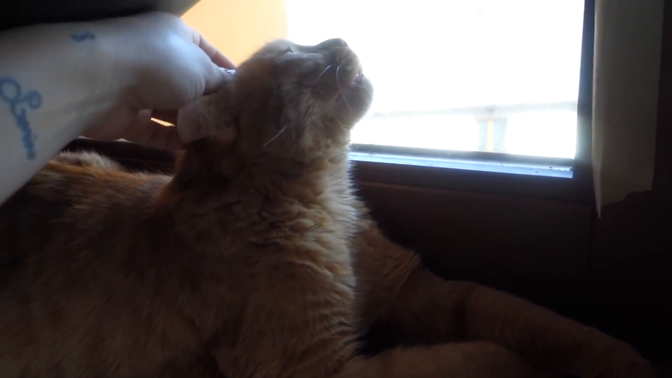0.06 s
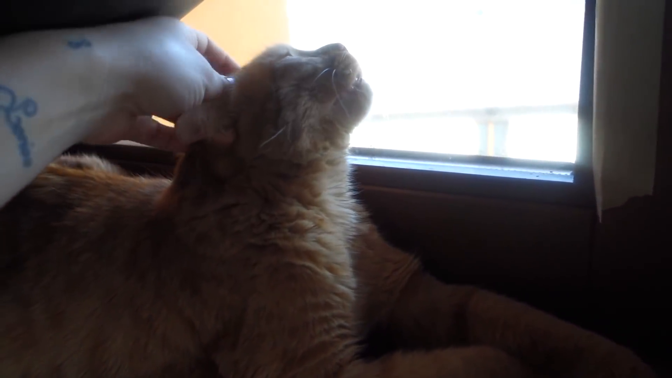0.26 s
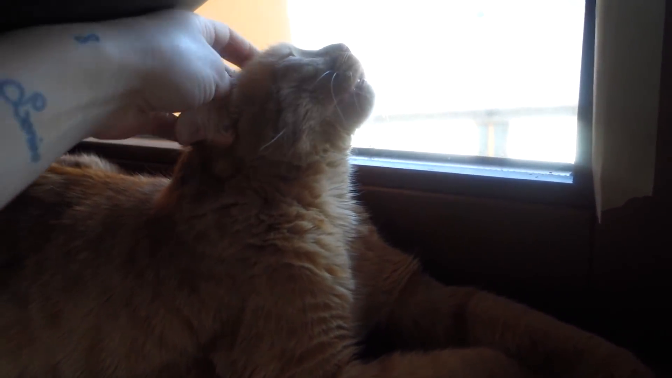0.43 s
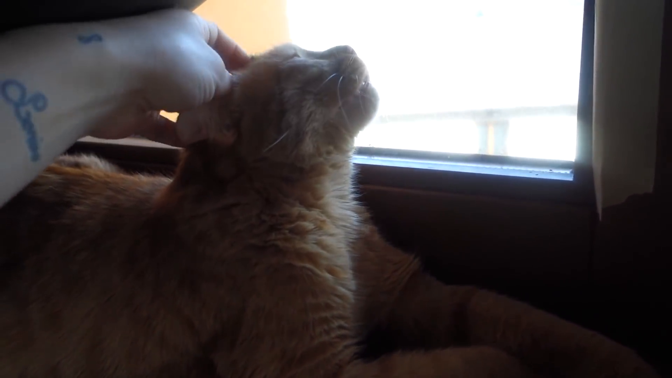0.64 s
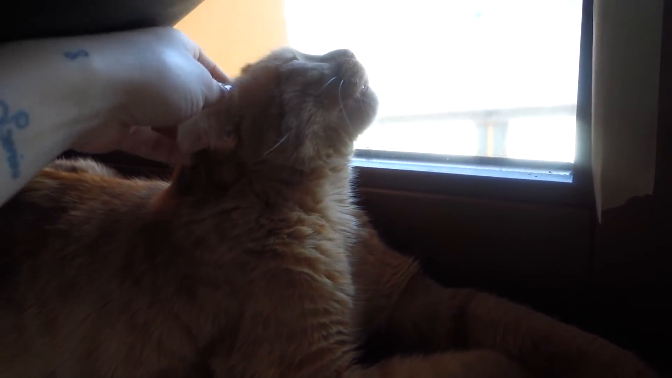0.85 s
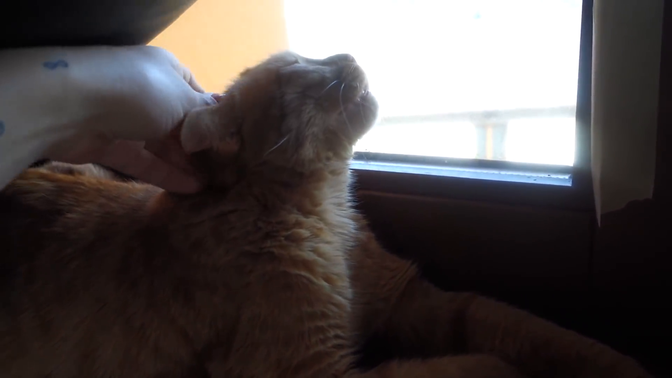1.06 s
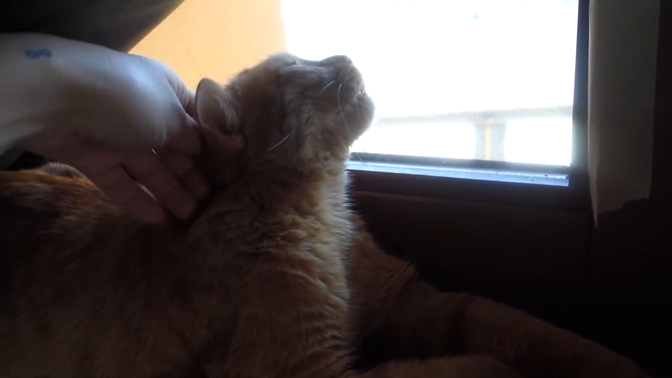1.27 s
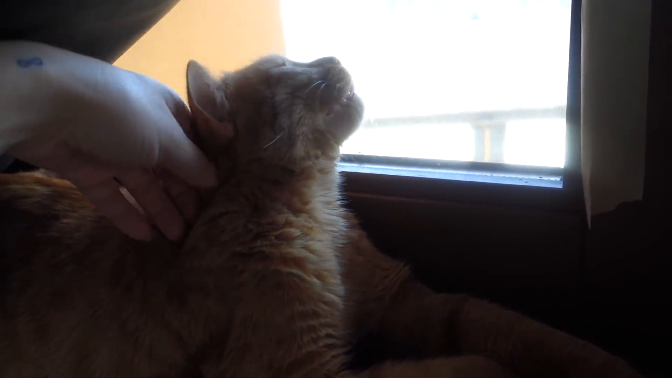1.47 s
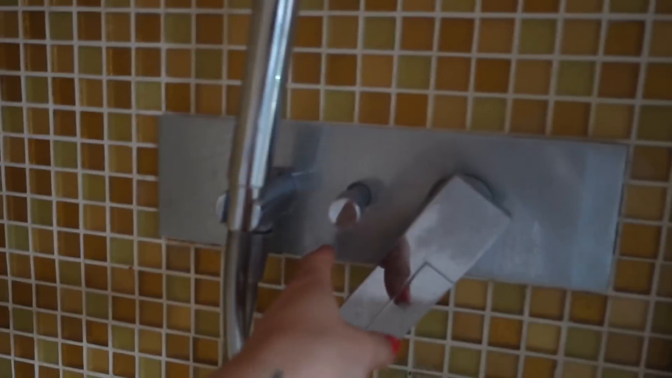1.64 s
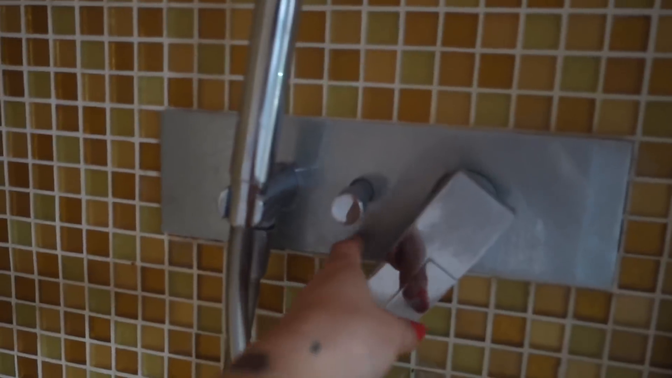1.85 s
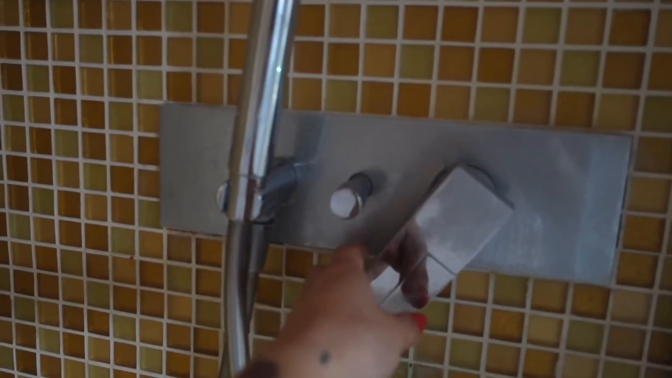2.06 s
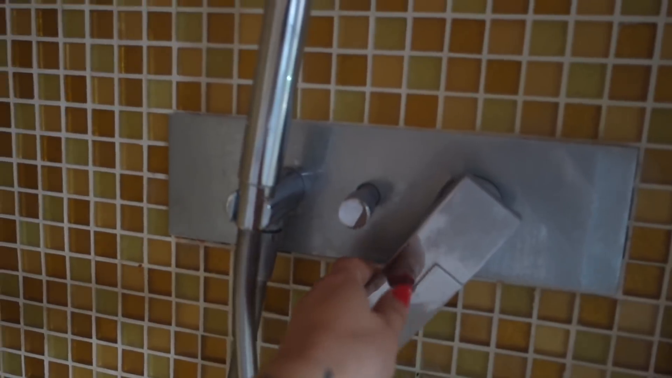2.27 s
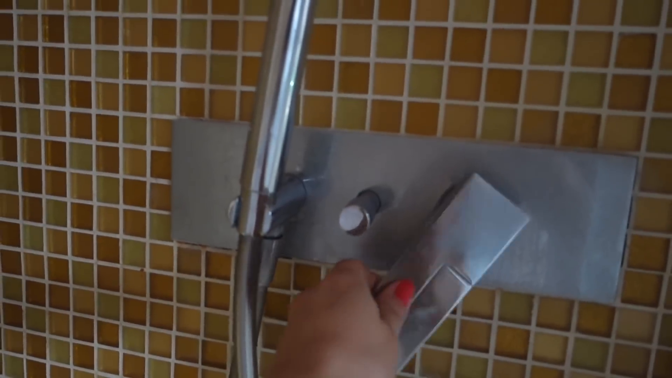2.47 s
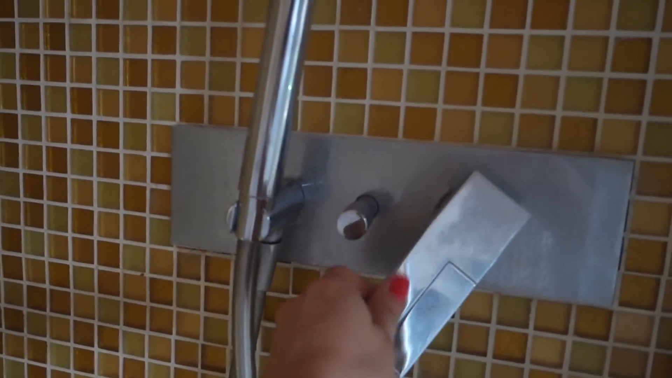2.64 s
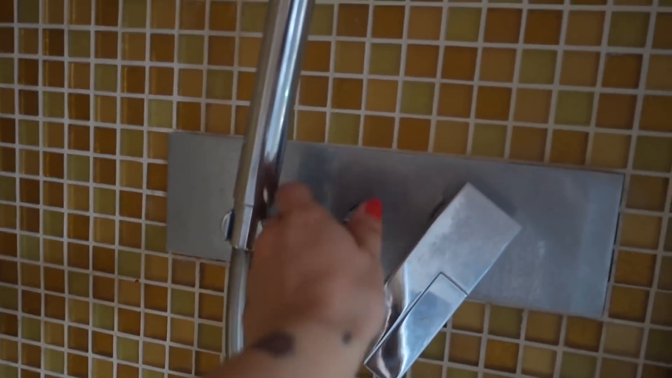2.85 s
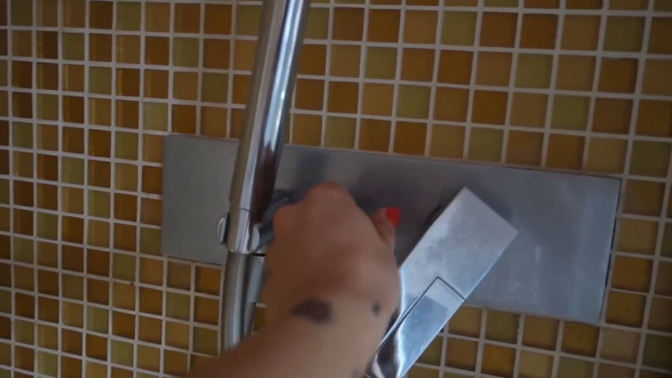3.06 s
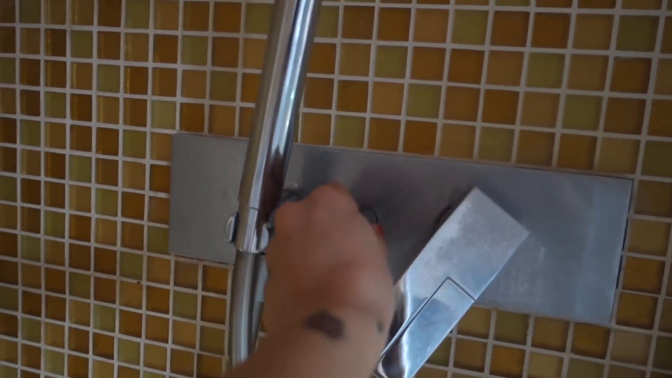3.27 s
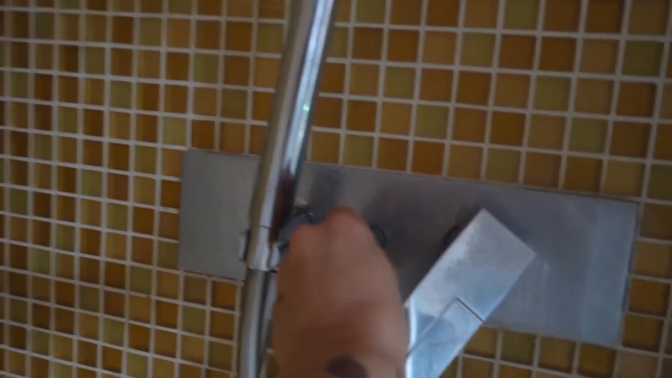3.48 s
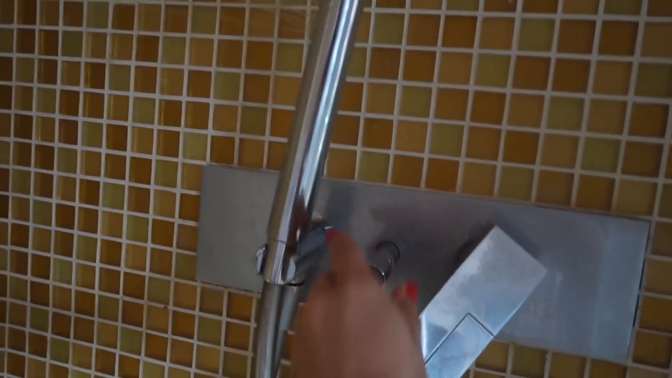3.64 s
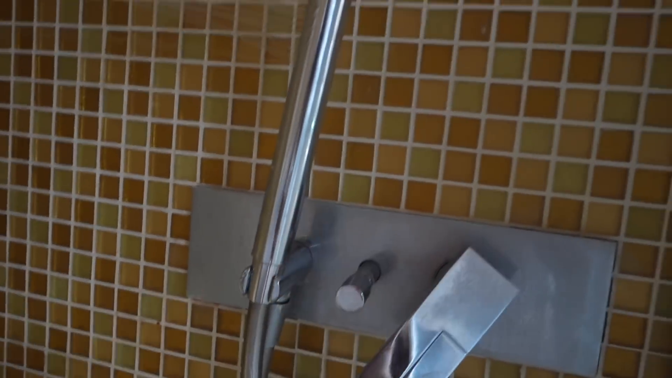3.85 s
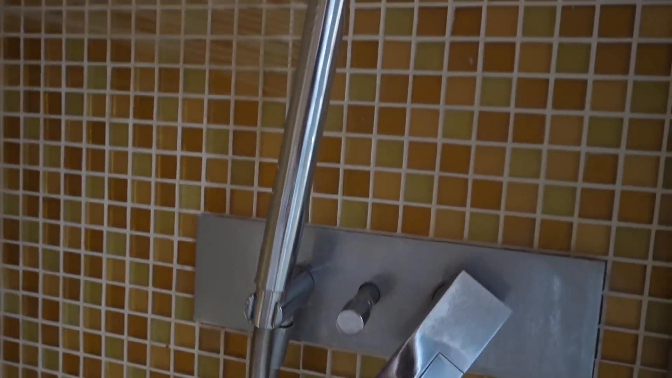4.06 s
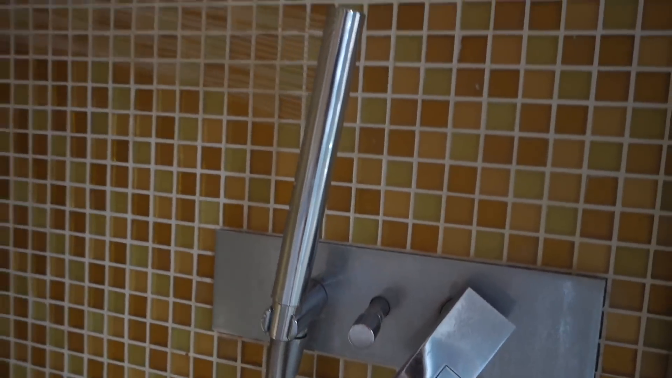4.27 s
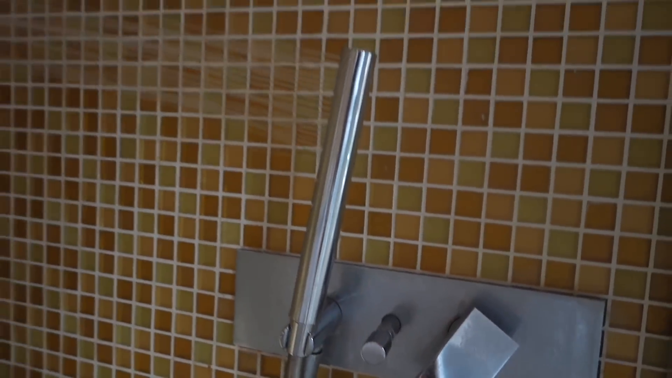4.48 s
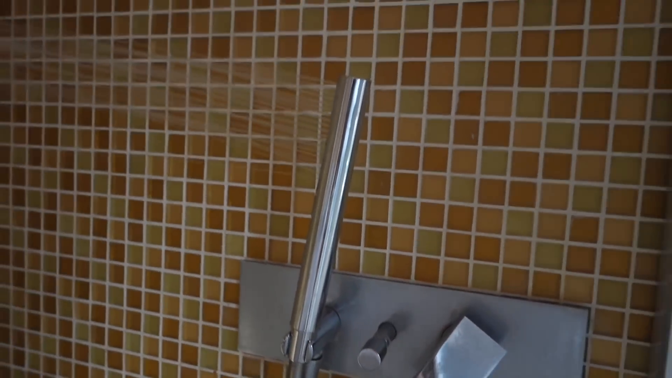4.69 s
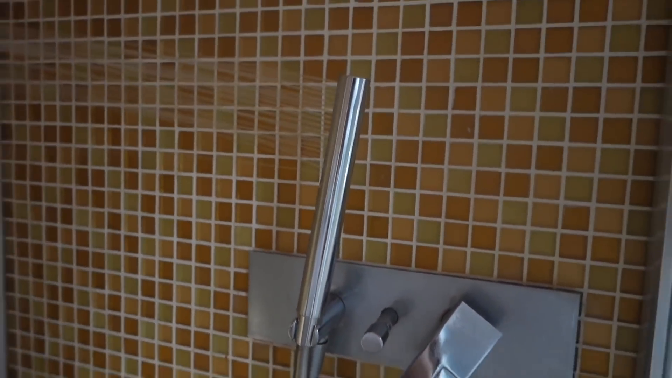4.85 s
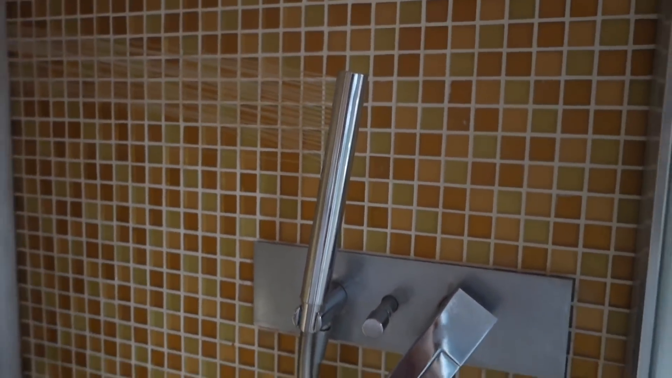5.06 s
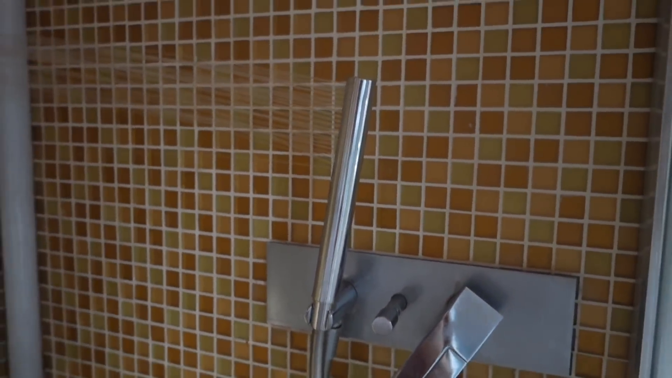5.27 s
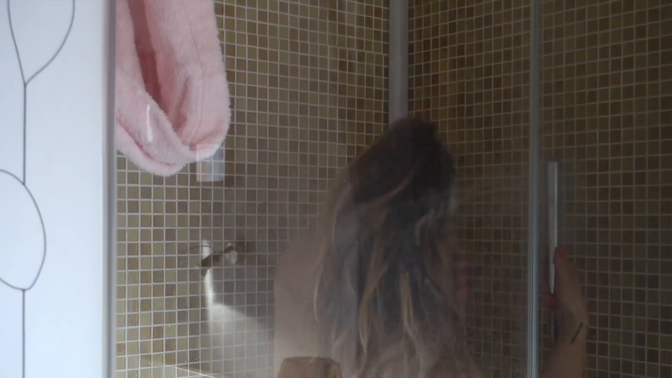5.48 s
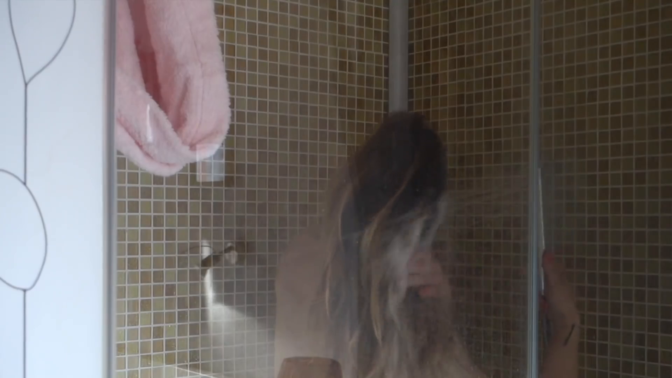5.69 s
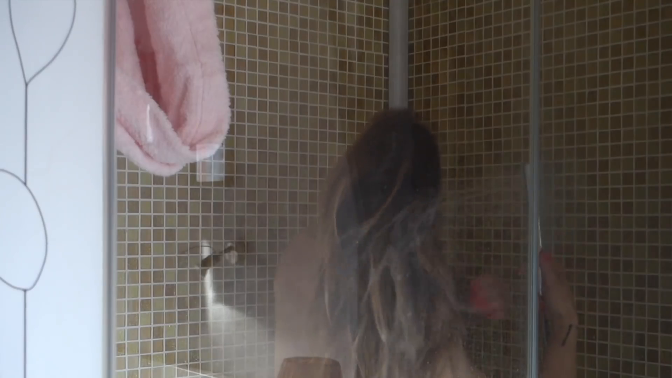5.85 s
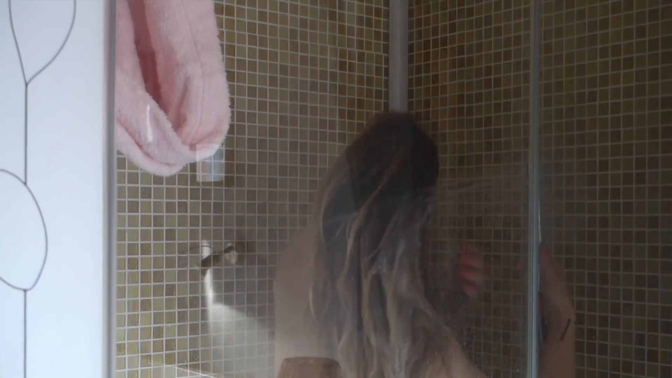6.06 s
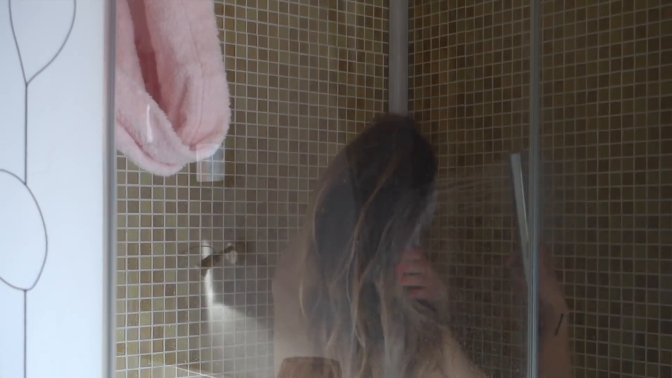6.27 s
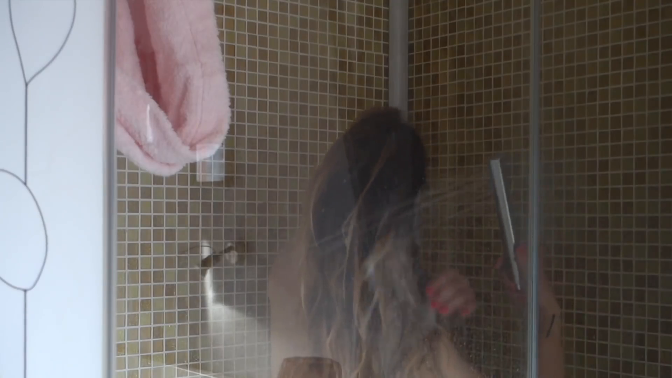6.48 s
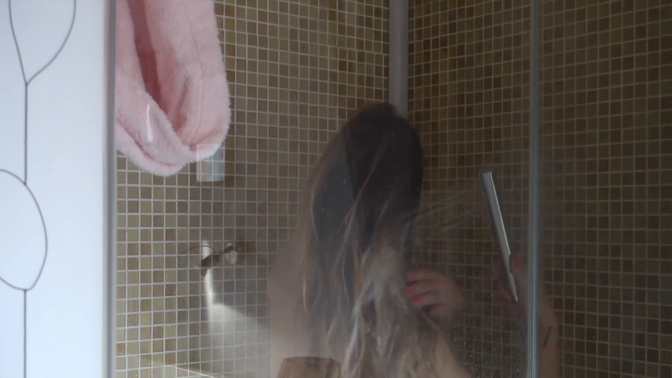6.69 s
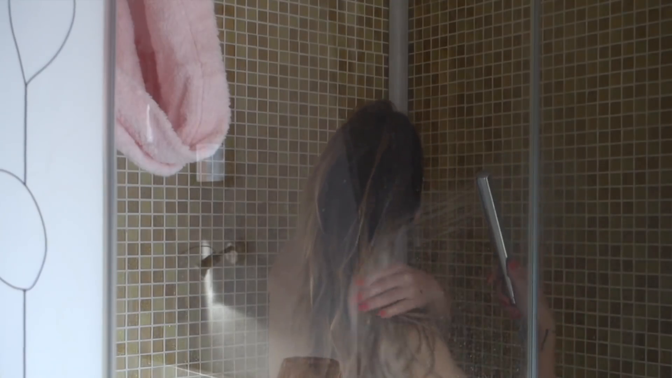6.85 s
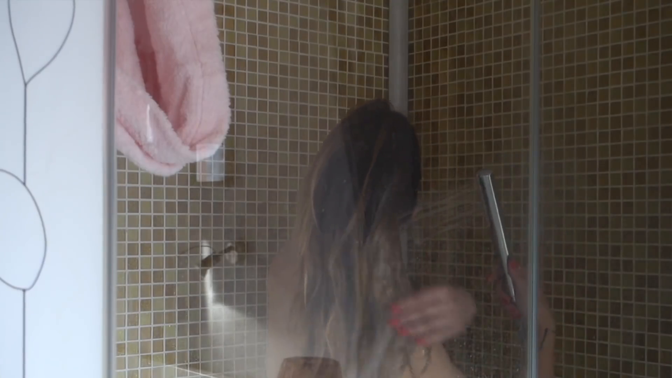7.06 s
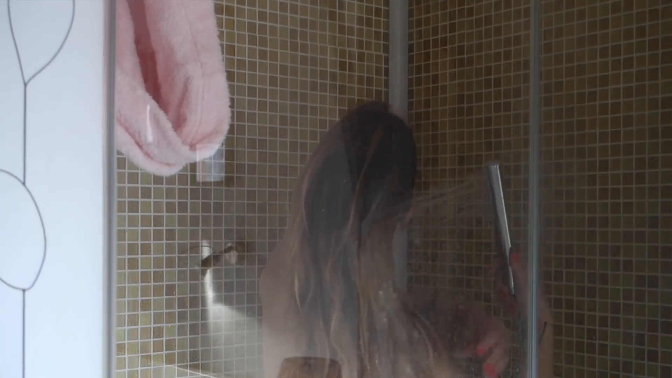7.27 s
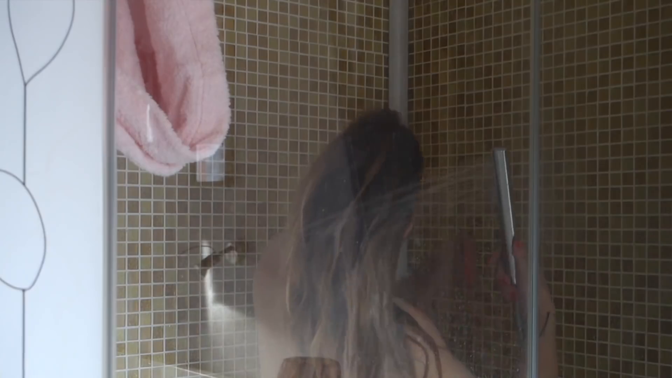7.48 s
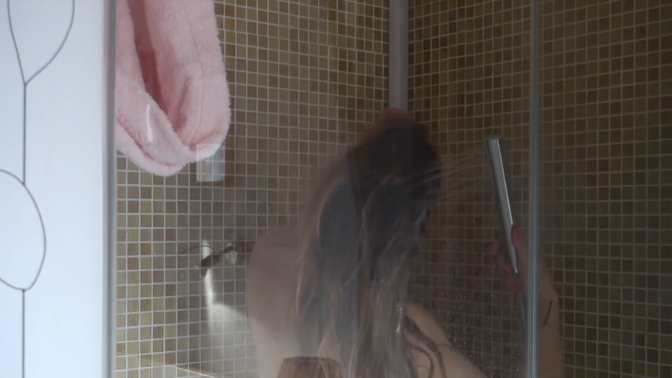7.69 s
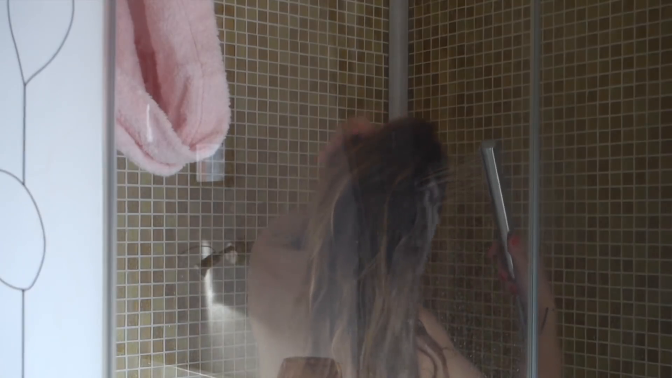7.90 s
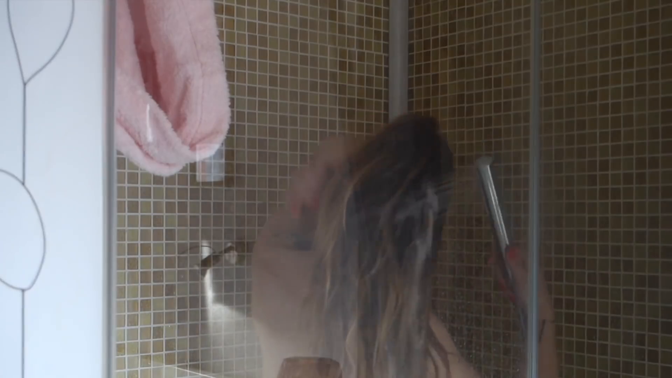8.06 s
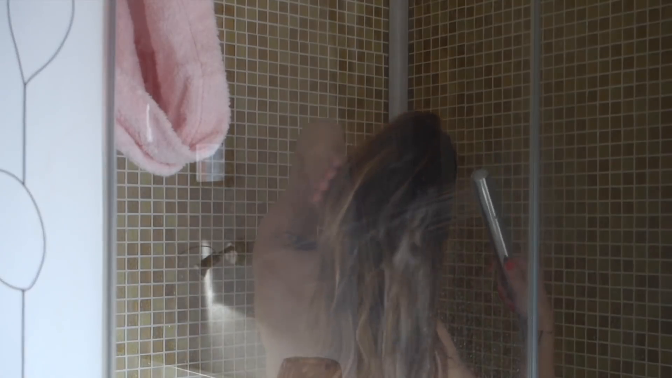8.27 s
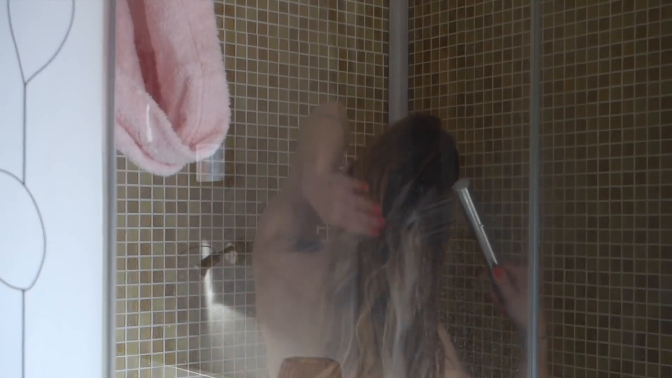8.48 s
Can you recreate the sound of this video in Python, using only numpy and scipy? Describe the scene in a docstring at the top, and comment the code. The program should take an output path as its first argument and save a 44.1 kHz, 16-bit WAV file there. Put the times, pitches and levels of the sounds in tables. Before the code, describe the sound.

Quiet room air, then a shower lever creaks, water gurgles and spits, a knock, and bright spray hisses on tiles before splattering through wet hair.

```python
"""A quiet room by a window is heard first, then the hollow air of a tiled shower cubicle: shaped noise.
The mixer lever is lifted, water gurgles through the tap as impacts on pipe resonances, and air spits out
as short noise bursts; the diverter shuts with a knock of decaying partials and a thud. The hand shower, dense
random impacts, hisses on the tiles, then plays on long hair, from which clumps slap the wet floor as bursts."""
import sys
import numpy as np
from scipy import signal
from scipy.fft import rfft, irfft, next_fast_len
from scipy.io import wavfile
from scipy.ndimage import uniform_filter1d

SR = 44100
rng = np.random.default_rng(int(sys.argv[2]) if len(sys.argv) > 2 else 0)


def unload_audio(sound):
    """Save the sound as a 16-bit wav file, at the path given as the first command line argument."""
    columns = np.transpose(np.atleast_2d(sound))
    # keep every value between -1 and 1, then stretch to whole-number steps
    steps = np.round(np.clip(columns, -1, 1) * 32767)
    wavfile.write(sys.argv[1], SR, steps.astype(np.int16))


N = 376173
TIME = np.arange(N) / SR

# Spectra, relative spectral density [f/Hz, level/dB]
# still air at the window and in the cubicle, and a steady hiss over both
WINDOW_SPECTRUM = [(47, -64), (80, -32), (195, -26), (329, -21.5), (369, -22.5), (459, -20.5), (487, -22),
                   (615, -4), (835, -7.5), (911, -4.5), (1150, -9), (1260, -3), (1490, -19), (1630, -10),
                   (2600, -27), (3380, -43), (5720, -120)]
CUBICLE_SPECTRUM = [(88, -58), (150, -26), (167, -14.5), (200, -25), (326, -9), (525, -16), (551, -15),
                    (636, -4.5), (779, -11.5), (1020, -5), (1140, 3.5), (1270, -6), (1590, -0.5),
                    (1860, -8), (2600, -25), (3380, -47), (5720, -120)]
HISS_SPECTRUM = [(1410, -23), (2400, 0), (3440, -4), (3910, -2.5), (5010, -5), (13000, -6)]
# water gushing from the spout, its fizz, and the rumble of the fitting [f/Hz, level/dB]
GUSH_SPECTRUM = [(70, -43), (140, -23), (170, -6.5), (200, -12), (500, 1.5), (900, -1), (1300, -2),
                 (1900, 2), (2600, -7), (3600, -26), (6000, -48)]
SPOUT_SPECTRUM = [(1800, -26), (2900, 6.5), (4300, -0.5), (5500, 3.5), (7000, -5), (10000, -5),
                  (13000, -8.5)]
RUMBLE_SPECTRUM = [(20, -18), (40, 7), (75, 11), (105, 7), (150, -25), (300, -40)]
# thud of the tiled wall and air spitting from the nozzles [f/Hz, level/dB]
THUD_SPECTRUM = [(24, -65), (40, -37), (234, -14.5), (371, 3), (647, -3), (712, 2), (886, -2.5),
                 (1020, -9.5), (1580, -2), (3190, -18), (4380, -14), (5570, -21), (7100, -39), (13000, -32)]
SPIT_SPECTRUM = [(1180, -11), (2000, -13), (2670, -13), (3980, -13), (7060, -5.5), (7630, -4), (8000, -6.5),
                 (11300, -0.5), (13000, -3.5)]
# spray on the tiles: patter on the wall and hiss of the jets [f/Hz, level/dB]
WALL_PATTER_SPECTRUM = [(35, -64), (60, -34), (135, -38.5), (179, -25.5), (259, -23.5), (335, -15),
                        (411, -10.5), (504, -11.5), (618, -7), (716, -8.5), (928, -8), (1420, -0.5),
                        (2770, -6), (5000, -7.5), (6500, -17.5), (11000, -120)]
WALL_JET_SPECTRUM = [(2650, -24), (4500, -10), (6480, -6), (12500, 0.5), (13000, -1.5)]
# spray on hair and back: drumming, streaming water, splatter, jets and one flare [f/Hz, level/dB]
DRUM_SPECTRUM = [(30, -32), (70, -26), (120, -14.5), (190, 3), (270, 0), (380, 1.5), (520, 2.5), (800, 2),
                 (1600, -40)]
WASH_SPECTRUM = [(70, -39), (250, -26), (480, -12), (640, -9.5), (880, -3), (1250, 0.5), (1700, 2),
                 (3000, -7.5), (6000, -42)]
SPLATTER_SPECTRUM = [(700, -76), (1300, -10), (2100, 4), (3200, 4), (4300, -3), (5600, -11), (7500, -13),
                     (13000, -11.5)]
HAIR_JET_SPECTRUM = [(100, -62), (2500, -8), (4500, 0.5), (7000, -6.5), (8800, -2.5), (10500, 5.5),
                     (12000, 6.5), (13200, 1)]
FLARE_SPECTRUM = [(500, -50), (4000, -5), (7000, -12), (9800, 1), (13000, -10)]
# a slap whose pitch is SLAP_HZ; other pitches scale the frequencies [f/Hz, level/dB]
SLAP_SPECTRUM = [(40, -62), (100, -38), (200, -29.5), (700, -24.5), (1400, -18), (2300, -1.5), (3000, 5),
                 (3800, 2.5), (5200, -8), (7500, -16), (13000, -24)]
# stereo image of each place [f/Hz, left-right likeness, L-R level/dB]
AIR_IMAGE = [(200, 0.43, 3), (700, .62, -5), (1150, 0, 3), (1600, 0.003, -8.5), (2670, 0, -0.5),
             (5000, 0, -5), (13000, 0.048, -6)]
WALL_IMAGE = [(300, 0.99, 0), (905, 0.69, -0.5), (1400, 0.86, -1), (2300, 0.47, -2), (3300, 0.34, -6),
              (5500, 0.036, -7.5), (8050, 0.018, -8), (11800, 0, -11.5)]
HAIR_IMAGE = [(306, 1, 0), (1100, 0.87, -.5), (2570, 1, 0), (3750, 0.72, -4), (4320, 0.2, -7),
              (6400, 0.073, -8.5), (7900, 0.32, -2.5), (12300, 0.19, -7)]
# pipe resonances [f/Hz, width/Hz, relative level/dB]
PIPE_MODES = [(265, 30, -13), (328, 20, -2.5), (362, 28, -5), (423, 19, 1.5), (473, 6.1, 3.5),
              (546, 23, -30), (616, 9.3, 1)]
# partials of the struck plumbing [f/Hz, relative level/dB, 60 dB decay time/s]
VALVE_MODES = [(179, -20.5, 0.48), (284.5, -5.5, 0.28), (366.6, 1.5, 0.25), (493, 0.5, 0.26),
               (592, -13, 0.1), (637, 3, 0.22), (720, -17, 0.075), (890, -8, 0.28), (1260, -4, 0.12),
               (1325, -8, 0.24), (1810, -16, 0.079), (2127, -5, 0.27)]
# standing waves between the tiled walls [f/Hz, boost/dB before STANDING_LOSS_DB]
STANDING_MODES = [(212, 8.5), (290, 8), (372, 4), (413, 6), (634, 7), (831, 10), (900, 7.5), (1080, 8.5),
                  (1316, 7.5)]
# knocks of lever and diverter [t/s, peak level/dB, contact cut-off f/Hz]
KNOCKS = [(2.384, -38, 1200), (2.398, -33, 600), (2.497, -30, 2430), (2.528, -29, 600),
          (3.395, -16.5, 1510), (3.406, -13.5, 5950), (3.418, -19, 1180), (3.431, -20.5, 1490),
          (3.47, -32, 800)]
# gritty ticks of the lever and the diverter knob [t/s, peak level/dB, pitch f/Hz]
TICKS = [(2.497, -42, 1850), (2.525, -40, 1710), (2.634, -40, 2300), (2.644, -25.5, 1680),
         (2.684, -37, 3460), (2.741, -44, 2590), (2.82, -27, 2700), (3.109, -32, 2010)]
# air spitting from the nozzles [t/s, peak level/dB, time scale of the burst/s]
SPITS = [(2.72, -30, 0.0017), (2.74, -26.5, 0.0029), (2.82, -24, 0.011), (2.847, -19.5, 0.0075),
         (2.908, -28, 0.0059), (3.184, -30.5, 0.0022), (3.27, -29, .007), (3.321, -20.5, 0.001),
         (3.397, -19.5, 0.00095), (3.402, -20.5, 0.003), (3.466, -28, 0.0046), (3.51, -22, 0.006)]
# groans of the pipe, one resonance each [t/s, length/s, mean f/Hz, level/dB]
GROANS = [(2.373, .11, 275.7, -37.5), (2.585, 0.068, 376, -30.5), (2.592, 0.14, 477, -27),
          (2.638, 0.075, 321, -32), (2.746, 0.055, 479, -26), (2.747, 0.076, 254, -37),
          (2.929, 0.097, 369, -34.5), (3.205, 0.13, 630, -39), (3.4, 0.083, 363, -23.5)]
# slugs of water surging from the spout [t/s, rise above the even flow/dB]
SURGES = [(2.6, 8.5), (2.645, 4), (2.82, 8), (3.12, 6.5)]
# soft bumps in the fitting, from the hand on the lever and from the knocks [t/s, level/dB]
BUMPS = [(1.925, -76), (2.3, -59), (2.405, -47), (2.575, -43), (3.41, -59), (3.475, -50)]
# how hard the jets strike hair and back, judged against STRIKE_USUAL_DB [t/s, level/dB, L-R level/dB]
STRIKE = [(5.39, -34.5, -6.0), (5.44, -31.5, -7), (5.87, -32.5, -7.5), (5.93, -27, -7), (6.44, -26, -6),
          (6.55, -31.5, -7.0), (6.65, -31, -6.0), (6.84, -31.5, -5.5), (6.97, -23, -5), (7.06, -26, -5),
          (7.12, -24, -5.0), (7.34, -34, -6), (7.42, -25.5, -7), (7.52, -31, -5.5), (7.59, -28, -3.5),
          (7.71, -29, -7), (7.77, -34, -6.5), (8.52, -25, -5.0)]
# water streaming off the body [t/s, level/dB before WASH_DB is added]
STREAM = [(5.39, -43.5), (5.47, -38.5), (7.11, -38), (7.49, -47), (7.82, -45.5), (7.84, -44), (8.52, -43.5)]
# jets drumming in hollows of hair and hand [t/s, length/s, first f/Hz, last f/Hz, level/dB]
HOLLOWS = [(5.406, .068, 1350, 1340, -28), (5.475, .29, 2800, 1620, -28.5), (5.846, 0.11, 2470, 2460, -27),
           (6.3, 0.2, 1950, 1850, -27), (7.779, 0.43, 1330, 1440, -31)]
# the larger falling clumps of water [t/s, peak level/dB, pitch f/Hz]
SLAPS = [(5.425, -27.5, 2690), (5.49, -27.5, 2780), (5.966, -27.5, 3770), (6.025, -24, 3020),
         (6.138, -23.5, 3400), (6.384, -19, 2700), (6.409, -19.5, 3090), (6.472, -15.5, 2830),
         (6.834, -24.5, 3760), (6.88, -22.5, 3570), (6.946, -19.5, 3400), (7.02, -22, 3660),
         (7.124, -15.5, 3290), (7.149, -19, 4240), (7.171, -14, 2840), (7.384, -16, 2950),
         (7.532, -24, 4420), (7.632, -15.5, 3100), (7.65, -23, 3100), (7.67, -20.5, 2900),
         (8.089, -19, 2860), (8.306, -20.5, 3620), (8.408, -17, 3400), (8.476, -20, 3600),
         (8.503, -18.5, 3000)]

CUBICLE_S, RINSE_S = 1.55, 5.37   # the cubicle is entered; the spray turns from the tiles to the hair
WINDOW_DB, CUBICLE_DB, HISS_DB = -58, -61, -58
CUBICLE_T60_S = 0.24
STANDING_WIDTH_HZ, STANDING_LOSS_DB = 5.4, -0.6
CUTOFF_HZ, PEAK_LIMIT = 13200, 0.8

TAP_OPEN_S, TAP_SHUT_S = 2.495, 3.42
# the first rush of water shakes the pipe hardest, then settles to an even flow
RUSH_S, RUSH_RISE_S, RUSH_SETTLE_S = 2.6, 0.039, 0.17
GURGLE_DB, GURGLE_RUSH_DB = -40, 12   # in even flow; extra at the rush
GUSH_DB, FIZZ_DB = -38, -44
SURGE_RISE_S, SURGE_FALL_S, FIZZ_FOLLOWS = 0.025, 0.055, 0.57   # last: share of a surge in the fizz
# the valve sings loudest while it is barely open
SING_HZ, SING_QUALITY = 1732, 12
SING_DB, SING_OPENING_DB, SING_SETTLE_S = -50.5, 21, 0.23
SHUDDER_DB, SHUDDER_RUSH_DB, SHUDDER_SETTLE_S = -73, 30, 0.34
BUMP_RISE_S, BUMP_FALL_S, RUB_DB = 0.012, 0.042, -66.5

# the jets come up at once, the patter follows when they reach the wall
SPRAY_ON_S = 3.45
JET_DB, JET_RISE_S, JET_GROWTH_DB, JET_GROWTH_S = -23, 0.033, 3.5, 0.33
PATTER_DB, PATTER_RISE_S = -32, 0.091
JET_LEAN_DB, JET_LEAN_DB_PER_S = -13.5, 2   # L-R; the hand shower moves towards the centre

# each layer at the usual strike, and the share of the strike's swing in dB that it follows
STRIKE_USUAL_DB = -29
HAIR_JET_DB, HAIR_JET_FOLLOWS = -25.5, 1.0
SPLATTER_DB, SPLATTER_FOLLOWS = -28.5, 0.82
DRUM_DB, DRUM_FOLLOWS = -51, 1.16
DRUM_GROWTH_DB_PER_S = 1.44   # the head bends into the spray
WASH_DB = 6
# the jets give one bright, brief flare of hiss
FLARE_S, FLARE_DB, FLARE_RISE_S, FLARE_FALL_S, FLARE_LEAN_DB = 6.305, -17.5, 0.006, 0.022, -5
# a big clump lands at once; each SLAP_DOUBLING_DB below SLAP_BIG_DB doubles the time scale
SLAP_HZ, SLAP_LENGTH_S, SLAP_BIG_DB, SLAP_DOUBLING_DB = 3060, 0.0011, -14.5, 7


def amp(db):
    """Level definition: decibels to amplitude gain."""
    return 10 ** (np.asarray(db) / 20)


def rms_one(x):
    """Power normalization: the centre of the stereo image gets rms 1."""
    return x / np.sqrt(np.mean(np.atleast_2d(x).mean(axis=0) ** 2) + 1e-20)


def peak_one(x):
    """Short-time power normalization: the loudest hundredth of a second gets rms 1."""
    power = np.atleast_2d(x).mean(axis=0) ** 2
    return x / np.sqrt(uniform_filter1d(power, size=440).max())


def in_time(rows):
    """Linear interpolation: each column of a curve table at every sample."""
    s, *columns = np.transpose(rows)
    return [np.interp(TIME, s, column) for column in columns]


def since(s):
    """Elapsed time: seconds since s, 0 before it."""
    return np.maximum(TIME - s, 0)


def between(start, end, fade_s):
    """Gating: 1 from start to end, with straight fades."""
    return np.clip(np.minimum(TIME - start, end - TIME) / fade_s + 0.5, 0, 1)


def swell(s, rise_s, fall_s):
    """Transient envelope: Gaussian growth to 1 at time s, then exponential decay."""
    return np.exp(-(np.minimum(TIME - s, 0) / rise_s) ** 2 - since(s) / fall_s)


def arch(s, length_s):
    """Half-sine envelope: rises from 0 to 1 and returns."""
    return np.sin(np.pi * np.clip((TIME - s) / length_s, 0, 1))


def drift(rate):
    """Random modulation: low-passed noise of rms 1, faster at a higher rate."""
    step = 40   # samples per slow value
    r = np.exp(-2 * step * np.pi * rate / SR)
    slow = signal.lfilter([1], [1, -2 * r, r * r], rng.standard_normal(N // step + 2002))
    slow = slow[2000:]   # drop the filter's start
    return np.interp(np.arange(N) / step, np.arange(len(slow)), rms_one(slow))


def resonator(hz, width_hz):
    """Damped oscillator: coefficients of a two-pole resonance with gain 1 on top."""
    r = np.exp(-np.pi * width_hz / SR)
    return (1 - r * r) / 2 * np.array([1, 0, -1]), [1, -2 * r * np.cos(2 * np.pi * hz / SR), r * r]


def noise(size=N):
    """Incoherent sources: two unrelated white noises."""
    return rng.standard_normal((2, size))


def drops(per_s, spread_db, wet_db):
    """Random impacts in a diffuse field: reflections of uneven clicks merge into a wash that follows them."""
    sizes = amp(spread_db * np.minimum(rng.exponential(1, (2, N)), 4)) * rng.choice([-1, 1], (2, N))
    clicks = sizes * (rng.random((2, N)) < per_s / SR)
    energy_decay = amp(-120 / (CUBICLE_T60_S * SR))   # 60 dB of energy in one T60
    energy = signal.lfilter([1], [1, -energy_decay], clicks ** 2 + 1e-18)
    return rms_one(clicks) + amp(wet_db) * rms_one(noise() * np.sqrt(energy))


def tint(pair, spectrum, image):
    """Spectral shaping and interaural likeness: mix two unrelated signals by frequency; rms 1."""
    size = next_fast_len(pair.shape[1], True)
    hz = np.arange(size // 2 + 1) * SR / size + 1   # offset keeps the logarithm finite

    def curves(table):
        table_hz, *columns = np.transpose(table)
        return [np.interp(np.log(hz), np.log(table_hz), column) for column in columns]

    level_db, = curves(spectrum)
    alike, lean_db = curves(image)
    alike, sides = np.clip(alike, -1, 1), np.array([[1], [-1]])
    below = np.minimum(hz / spectrum[0][0], 1)   # falls away below the lowest point
    gain = amp(level_db + sides * lean_db / 2) * below
    mid, side = rfft(pair, size)
    both = (np.sqrt(1 + alike) * mid + sides * np.sqrt(1 - alike) * side) * gain
    return rms_one(irfft(both, size)[:, :pair.shape[1]])


def steer(x, lean_db):
    """Level-difference panning: set the left-right balance of a diffuse sound; rms 1."""
    gains = amp(np.array([[1], [-1]]) * lean_db / 2)
    return rms_one(x / x.std(axis=1, keepdims=True) * gains / np.hypot(*gains))


def near_walls(x, echo_db, count=10):
    """Comb filtering: echoes from tiles and glass within a few milliseconds; rms 1."""
    lags = (rng.uniform(0.001, 0.011, count) * SR).astype(int)
    echoes = np.zeros_like(x)
    for lag, sign in zip(lags, rng.choice([-1, 1], count)):
        echoes[:, lag:] += sign * x[:, :-lag]
    return rms_one(x + amp(echo_db) * echoes / np.sqrt(count))


def standing_waves(x):
    """Room modes: the narrow cubicle rings at a few low pitches."""
    rings = sum((amp(db) - 1) * signal.lfilter(*resonator(hz, STANDING_WIDTH_HZ), x + 1e-18)
                for hz, db in STANDING_MODES)
    return amp(STANDING_LOSS_DB) * (x + rings)


def glide(hz, quality):
    """Constant-Q resonance: dense impacts through a pitch that may move, width in proportion; rms 1."""
    source = drops(per_s=2000, spread_db=5.0, wet_db=-9.0)[0]
    out, state = np.zeros(N), np.zeros((2, 2))
    block = 256
    for i in range(0, N, block):
        section = np.concatenate(resonator(hz[i], hz[i] / quality))
        out[i:i + block], state = signal.sosfilt([section, section], source[i:i + block], zi=state)
    return rms_one(out / np.sqrt(hz))


def burst(spectrum, image, length_s, t60, direct_db):
    """Impact and reverberation: a clump of impacts swells and thins out, and the cubicle rings on."""
    t = TIME[:SR // 2]
    age = t / max(length_s, 5e-4)
    clump = (age * np.exp(-age)) ** 2
    ring = signal.lfilter([1], [1, -amp(-120 / (t60 * SR))], clump) / clump.sum()
    impacts = rms_one(noise(len(t)) * (rng.random(len(t)) < 4000 / SR))
    direct = amp(direct_db) * impacts * np.sqrt(clump / clump.max())
    return peak_one(tint(direct + noise(len(t)) * np.sqrt(ring), spectrum, image))


def add(out, s, sound):
    """Superposition: mix a sound in at time s."""
    at = int(s * SR)
    out[:, at:at + sound.shape[-1]] += sound[..., :N - at]


def still_air():
    """Diffuse background noise: outdoor wash at the window, then hollow cubicle air, over a steady hiss."""
    window = amp(WINDOW_DB) * tint(noise(), WINDOW_SPECTRUM, AIR_IMAGE) * between(-1, CUBICLE_S, 0.018)
    cubicle = amp(CUBICLE_DB) * tint(noise(), CUBICLE_SPECTRUM, AIR_IMAGE) * between(CUBICLE_S, 10, 0.02)
    return window + cubicle + amp(HISS_DB) * tint(noise(), HISS_SPECTRUM, AIR_IMAGE)


def shudder():
    """Forced vibration: water rush, the hand and the knocks bump the fitting into a rumble; the hand rubs
    faintly."""
    rush = amp(SHUDDER_DB + SHUDDER_RUSH_DB * swell(RUSH_S, RUSH_RISE_S, SHUDDER_SETTLE_S))
    rush = rush * between(TAP_OPEN_S, TAP_SHUT_S, 0.014)
    bumps = sum(amp(db) * swell(s, BUMP_RISE_S, BUMP_FALL_S) for s, db in BUMPS)
    rub = amp(RUB_DB) * between(BUMPS[0][0], TAP_OPEN_S, 0.01) * tint(noise(), GUSH_SPECTRUM, WALL_IMAGE)
    return (rush + bumps) * tint(noise(), RUMBLE_SPECTRUM, HAIR_IMAGE) + rub


def ticks():
    """Stick-slip friction: metal parts give short, dry ticks."""
    out = np.zeros((2, N))
    for s, db, hz in TICKS:
        colour = [(hz / 2, -14), (hz, 0), (hz * 2, -22), (CUTOFF_HZ, -30)]
        add(out, s, amp(db) * burst(colour, WALL_IMAGE, length_s=0.00085, t60=0.11, direct_db=-4.0))
    return out


def knocks():
    """Modal excitation: each blow rings the plumbing and thuds through the wall; soft contact is duller."""
    out, t = np.zeros((2, N)), TIME[:SR // 2]
    for s, db, hard_hz in KNOCKS:
        ring = np.zeros(len(t))
        for hz, level, t60 in VALVE_MODES:
            decay = amp(level + rng.normal(0, 0.8) - 60 * t / t60)
            ring += decay * np.sin(2 * np.pi * hz * t) * rng.choice([-1, 1])
        thud = burst(THUD_SPECTRUM, WALL_IMAGE, length_s=0.0027, t60=0.28, direct_db=0.5)
        contact = signal.butter(1, min(hard_hz, SR / 3), fs=SR)
        blow = signal.lfilter(*contact, peak_one(ring) + amp(4) * thud)
        add(out, s, amp(db) * peak_one(blow))
    return out


def spits():
    """Pressure release: trapped air bursts out of the nozzles."""
    out = np.zeros((2, N))
    for s, db, length_s in SPITS:
        spit = burst(SPIT_SPECTRUM, WALL_IMAGE, length_s, t60=0.2, direct_db=-1.0)
        add(out, s, amp(db) * peak_one(near_walls(spit, echo_db=-13.0)))
    return out


def groans():
    """Mode locking: passing air holds the pipe on one resonance, which swells, wavers and fades."""
    waver = np.cumsum(1 + 0.00935 * drift(26.0)) / SR   # unsteady time, in seconds
    return sum(amp(db) * arch(s, length_s) * np.sqrt(2) * np.sin(2 * np.pi * hz * waver)
               for s, length_s, hz, db in GROANS)


def tap():
    """Resonance under random impact: slugs of water and air shake the pipe and gush from the spout."""
    rush = swell(RUSH_S, RUSH_RISE_S, RUSH_SETTLE_S)
    surge_db = sum(db * swell(s, SURGE_RISE_S, SURGE_FALL_S) for s, db in SURGES)
    at_spout = np.clip(1 + (TIME - RUSH_S) / RUSH_RISE_S, 0, 1)

    slugs = drops(per_s=700, spread_db=2.0, wet_db=-1.5)[0]
    # each resonance swells on its own
    pipe = sum(signal.lfilter(*resonator(hz, width), slugs) * amp(db + 2 * drift(8))
               for hz, width, db in PIPE_MODES)
    pipe = signal.sosfilt(signal.butter(4, 220, "high", fs=SR, output="sos"), pipe)
    pipe = amp(GURGLE_DB + GURGLE_RUSH_DB * rush) * rms_one(pipe)

    gush = tint(drops(per_s=630, spread_db=3, wet_db=-1), GUSH_SPECTRUM, WALL_IMAGE)
    gush = amp(GUSH_DB + surge_db) * near_walls(gush, echo_db=-1)
    fizz = tint(drops(per_s=540, spread_db=6, wet_db=1), SPOUT_SPECTRUM, WALL_IMAGE)
    fizz_db = FIZZ_DB + FIZZ_FOLLOWS * surge_db + 1.4 * drift(10)
    fizz = amp(fizz_db) * near_walls(fizz, echo_db=4)

    sing_db = SING_DB + SING_OPENING_DB * np.exp(-since(TAP_OPEN_S) / SING_SETTLE_S) + 1.6 * drift(20)
    sing = amp(sing_db) * glide(np.full(N, SING_HZ), SING_QUALITY)
    return (pipe + (gush + fizz) * at_spout + sing) * between(TAP_OPEN_S, TAP_SHUT_S, 0.016) + groans()


def spray_on_tiles():
    """Superposed impacts: jets hiss close by, growing as pressure builds, and patter densely on the wall."""
    age = since(SPRAY_ON_S)
    patter = tint(drops(per_s=3000, spread_db=6.5, wet_db=6.0), WALL_PATTER_SPECTRUM, WALL_IMAGE)
    patter = amp(PATTER_DB + 0.3 * drift(3.6)) * standing_waves(patter)

    jet_db = JET_DB - JET_GROWTH_DB * np.exp(-age / JET_GROWTH_S)
    lean_db = JET_LEAN_DB + JET_LEAN_DB_PER_S * np.minimum(age, RINSE_S - SPRAY_ON_S)
    jet = tint(drops(per_s=9000, spread_db=2.5, wet_db=4), WALL_JET_SPECTRUM, WALL_IMAGE)
    jet = amp(jet_db + 0.72 * drift(22)) * steer(jet, lean_db)

    spray = patter * np.minimum(age / PATTER_RISE_S, 1) + jet * np.minimum(age / JET_RISE_S, 1)
    return spray * between(SPRAY_ON_S, RINSE_S, 0.013)


def slaps():
    """Impact radiation: clumps of water leave the hair and slap the floor, each at its own pitch."""
    out = np.zeros((2, N))
    for s, db, hz in SLAPS:
        colour = [(f * hz / SLAP_HZ, level) for f, level in SLAP_SPECTRUM]
        length_s = SLAP_LENGTH_S * 2 ** ((SLAP_BIG_DB - db) / SLAP_DOUBLING_DB)
        slap = burst(colour, HAIR_IMAGE, length_s, t60=0.4, direct_db=1.5)
        add(out, s, amp(db) * peak_one(near_walls(slap, echo_db=-3)))
    return out


def hollows():
    """Cavity resonance: drops excite an air pocket whose pitch glides as hand and head move."""
    pitch_points = []
    for s, length_s, first_hz, last_hz, _ in HOLLOWS:
        pitch_points += [(s, first_hz), (s + length_s, last_hz)]
    hz, = in_time(pitch_points)
    opening = sum(amp(db) * arch(s, length_s) for s, length_s, _, _, db in HOLLOWS)
    return opening * glide(hz, quality=2.75)


def spray_on_hair():
    """Impact strength: harder jets drum more on head and back, hiss in the hair and splatter on the floor."""
    hiss_db, lean_db = in_time(STRIKE)
    strike_db = hiss_db - STRIKE_USUAL_DB

    drum = tint(drops(per_s=690, spread_db=3.5, wet_db=0.5), DRUM_SPECTRUM, HAIR_IMAGE)
    drum_db = DRUM_DB + DRUM_FOLLOWS * strike_db + DRUM_GROWTH_DB_PER_S * since(RINSE_S)
    drum = amp(drum_db + 1.4 * drift(13)) * drum

    wash = tint(drops(per_s=1200, spread_db=3, wet_db=5.5), WASH_SPECTRUM, HAIR_IMAGE)
    wash = amp(WASH_DB + in_time(STREAM)[0] + 1.0 * drift(14)) * wash

    splatter = tint(drops(per_s=550, spread_db=4.5, wet_db=5), SPLATTER_SPECTRUM, HAIR_IMAGE)
    splatter_db = SPLATTER_DB + SPLATTER_FOLLOWS * strike_db + 0.27 * drift(8.3)
    splatter = amp(splatter_db) * near_walls(splatter, echo_db=-9)

    jet = tint(drops(per_s=6000, spread_db=3.0, wet_db=7), HAIR_JET_SPECTRUM, HAIR_IMAGE)
    jet = steer(near_walls(jet, echo_db=-5), lean_db)
    hiss = amp(HAIR_JET_DB + HAIR_JET_FOLLOWS * strike_db + 1.0 * drift(23)) * jet

    flare = steer(tint(noise(), FLARE_SPECTRUM, HAIR_IMAGE), FLARE_LEAN_DB)
    flare = amp(FLARE_DB) * swell(FLARE_S, FLARE_RISE_S, FLARE_FALL_S) * flare

    resonant = standing_waves(drum + wash + hollows())
    return (resonant + splatter + hiss + flare) * between(RINSE_S, 10, 0.018)


def scene():
    """Linear superposition: air, plumbing and water together."""
    plumbing = tap() + shudder() + knocks() + ticks() + spits()
    return still_air() + plumbing + spray_on_tiles() + slaps() + spray_on_hair()


def record(dry):
    """Saturation and band limiting: the highest peaks are rounded and the top is cut steeply."""
    rounded = dry / (1 + (dry / PEAK_LIMIT) ** 6) ** (1 / 6)
    return signal.sosfilt(signal.ellip(12, 0.1, 80, CUTOFF_HZ, fs=SR, output="sos"), rounded)


dry = scene()
out = record(dry)
unload_audio(out)
```